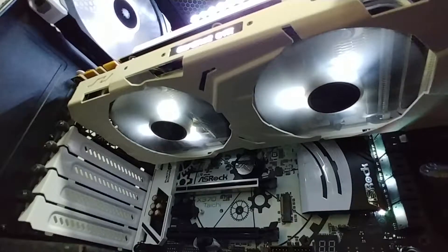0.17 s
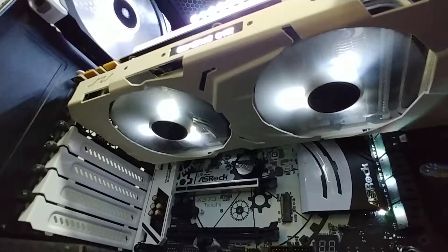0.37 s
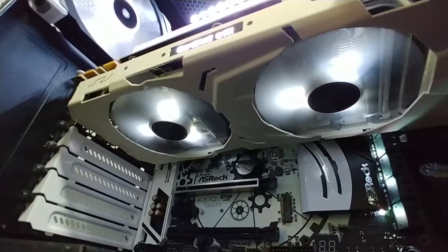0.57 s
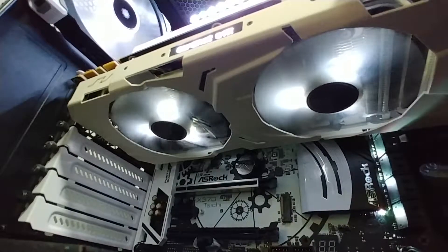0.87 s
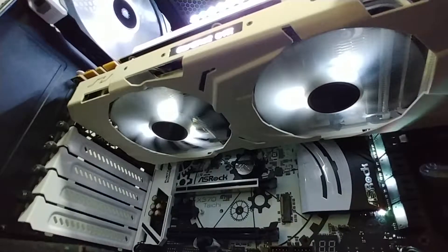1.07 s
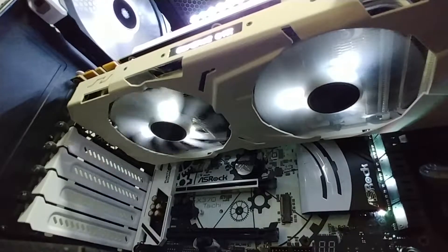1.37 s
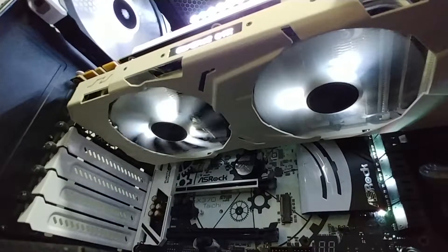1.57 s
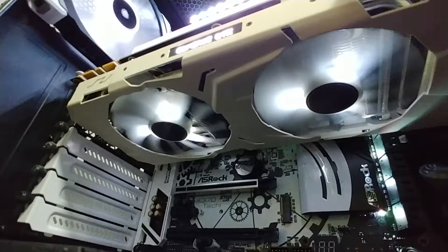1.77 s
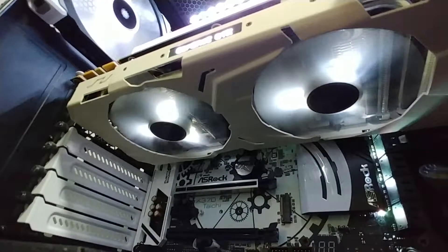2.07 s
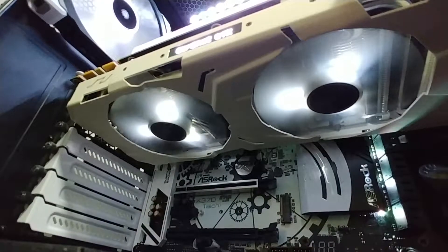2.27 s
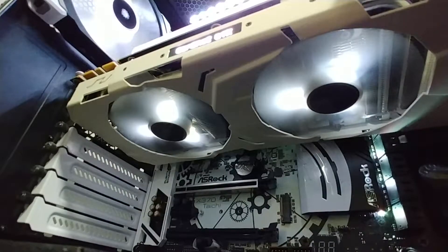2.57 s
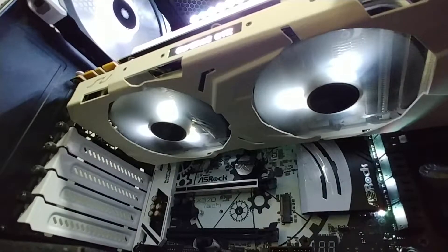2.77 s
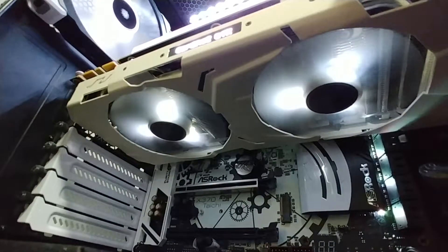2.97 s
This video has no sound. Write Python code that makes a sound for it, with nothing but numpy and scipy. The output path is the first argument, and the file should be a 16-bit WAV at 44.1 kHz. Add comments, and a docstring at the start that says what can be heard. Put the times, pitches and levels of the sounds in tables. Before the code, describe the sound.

Steady low fan whir and hum, faint once-a-second ticks, and two short plastic rattles late on.

```python
"""Rubbing fan in an open computer case

Fans whir as filtered noise and hum as wavering sines; their draught puffs at the right microphone.
A fast fan rubs in two short bursts: one click per turn rings plastic modes and echoes in the case,
over a low growl of noise, with a brief hiss and a last light scrape.
A faint buzz pulses evenly, and a tick like a clock's comes once a second through the room."""
import sys
import numpy as np
from scipy import signal
from scipy.fft import rfft, irfft
from scipy.io import wavfile
from scipy.ndimage import uniform_filter1d

SR = 44100
rng = np.random.default_rng(int(sys.argv[2]) if len(sys.argv) > 2 else 0)


def wrap_up_sound(samples):
    """Save the sound to the file named by the first command line argument, as 16-bit audio."""
    columns = np.atleast_2d(samples).T
    # keep every value between -1 and 1, then stretch to whole-number steps
    tamed = np.clip(columns, -1, 1)
    steps = np.round(tamed * 32767).astype(np.int16)
    wavfile.write(sys.argv[1], SR, steps)


N = 138033
TIME = np.arange(N) / SR  # s
FREQS = np.maximum(np.arange(N // 2 + 1) * SR / N, 1)  # Hz

# Every pan_db and balance_db is left minus right; every colour is a relative noise spectrum.
# Rush of air through fans and case: frequency_hz [Hz], density_db [dB per Hz]
AIR_COLOUR = [(25, 0.5), (50, 5.5), (85, 5.5), (115, 6.5), (150, -0.1), (185, 2), (220, -3.5), (265, -0.75),
              (305, -5), (350, -2.5), (395, -7.5), (430, -3), (490, -2.5), (540, -9), (600, -7.5),
              (670, -14.5), (880, -13.5), (970, -11), (1030, -12), (1130, -8), (1290, -8), (1450, -16),
              (1950, -16), (2170, -13), (2330, -18.5), (2450, -15.5), (2650, -20.5), (3100, -20),
              (3480, -17), (3800, -22), (4550, -23.5), (5300, -24.5), (5700, -29.5), (6300, -31.5),
              (7400, -37), (9000, -41.5), (12000, -51)]
# Stereo balance of the air: frequency_hz [Hz], balance_db [dB]
AIR_BALANCE = [(40, -9.5), (110, -3), (480, -3.5), (760, 3.5), (1100, -5), (1700, -1), (2200, -3),
               (3400, -8.5), (5000, -3), (5400, -6), (5900, -4), (6800, -1), (11000, -0.5)]
# Left-right likeness of the air: frequency_hz [Hz], correlation [-1 to 1]
AIR_CORRELATION = [(40, -0.41), (130, 0.54), (270, 0.79), (470, .8), (650, -0.41), (780, 0.47), (900, -0.8),
                   (1080, 0.32), (1170, -0.89), (1250, 0.18), (1420, -0.5), (1550, -0.15), (1850, -0.66),
                   (2050, -0.12), (2600, -0.33), (5000, 0.22), (11000, -0.024)]
# Motor and blade hums, bearing and coil whines: pitch_hz [Hz], level_db [dB before HUM_DB], pan_db [dB]
HUM_TONES = [(100.3, -45.3, -3), (120.1, -54, -1), (124.3, -55, -1), (239.9, -55.5, -5.5), (338, -64, -3.5),
             (360.5, -62.5, -3), (478.7, -62, -3), (719.5, -73, 1), (2400.3, -66, -10.5), (5761, -83, -10),
             (8641.5, -94, -2.5)]
# Narrow band of the electrical buzz: pitch_hz [Hz], level_db [dB], t60_s [s], pan_db [dB]
BUZZ_MODES = [(2660, -58, 0.047, -14), (2720, -60.5, 0.038, -1)]
# Puffs of draught on the microphone: centre_s [s], length_s [s], level_db [dB]
PUFFS = [(0.386, 0.05, -31.5), (0.789, 0.039, -32), (0.837, 0.091, -33.5), (1.25, 0.082, -40),
         (1.66, 0.15, -37), (2.007, 0.031, -29.5), (2.93, 0.032, -26.5), (3.007, 0.031, -26.5),
         (3.096, 0.051, -33)]
# Colour of the puffs: frequency_hz [Hz], density_db [dB per Hz]
PUFF_COLOUR = [(12, -12), (30, -6), (50, -1), (80, 2), (120, -10), (200, -28), (500, -68), (2000, -100)]
# Ticks in the room: start_s [s], level_db [dB before the direct and room gains]
TICKS = [(0.6001, -39), (1.598, -38.5), (2.5972, -39.5)]
# Ring of a tick: pitch_hz [Hz], level_db [dB against the tick], t60_s [s], pan_db [dB]
TICK_MODES = [(1435, 0, 0.018, -3), (2270, -11, 0.0077, 0), (3510, -2, 0.02, -2), (3840, -5.5, 0.018, -1),
              (4700, -13, 0.0095, -6), (5400, -0.5, 0.016, 9), (5580, -9, 0.015, 1), (7230, -10, 0.012, 10)]
# Colour of a tick's crack: frequency_hz [Hz], density_db [dB per Hz]
CRACK_COLOUR = [(600, -14), (1400, 2), (2700, 5), (3700, 0.5), (5600, -1.5), (6500, -19), (7600, -2.5),
                (9000, -35), (12000, -38)]
# Growl under both bursts, swelling with each: time_s [s], level_db [dB]
GROWL_LEVELS = [(2.09, -69), (2.14, -50), (2.19, -45), (2.25, -48), (2.33, -48.5), (2.4, -45.5),
                (2.46, -45.5), (2.52, -65)]
# Colour of the growl: frequency_hz [Hz], density_db [dB per Hz]
GROWL_COLOUR = [(150, -16.5), (270, -9), (360, -1), (490, 1.5), (600, -3.5), (660, -10), (800, -13),
                (1500, -25), (4000, -63)]
# Colour of the gritty hiss: frequency_hz [Hz], density_db [dB per Hz]
HISS_COLOUR = [(500, -20), (1600, 12), (4000, -8), (7000, -6), (10000, -10.5), (12000, -22)]
# Colour of the last light scrape: frequency_hz [Hz], density_db [dB per Hz]
SCRAPE_COLOUR = [(2500, -12), (4500, 6), (5250, 8), (6100, -11), (8000, -13), (12000, -38)]
# Blade touches, one a turn: start_s [s], level_db [dB before TOUCH_DB or SNAP_DB],
# tilt_db [dB per octave], rebound_db [dB added at each rebound]
TOUCHES = [(2.0398, -37.5, -10, -4), (2.073, -40, 0, -5), (2.111, -30, 0, -2), (2.1428, -26, 1, -2.5),
           (2.1727, -20.5, 7.5, -9), (2.2013, -24, 3, -4.5), (2.2307, -31, 4.7, -2),
           (2.3209, -31.5, -2.5, -17), (2.3530, -30, -2, -13), (2.3837, -24.5, 1, -19),
           (2.4111, -25, -5, -24), (2.4385, -23.5, 3, -11)]
# Plastic blade and shroud: pitch_hz [Hz, mean over touches], level_db [dB], t60_s [s], pan_db [dB]
BLADE_MODES = [(2920, -12, .0106, 1.5), (3060, -4, 0.0046, -9), (3860, -4, 0.0062, -6.5),
               (4310, -12.5, 0.0096, -16), (5100, -13.5, 0.002, -9), (5660, -21, 0.0027, -7)]
# Rough snap of each contact: frequency_hz [Hz], density_db [dB per Hz]
SNAP_COLOUR = [(800, -15), (2000, -7.5), (3500, 5.5), (4600, -2.5), (5400, -9.5), (7000, -22)]
# Delayed repeats of each knock: delay_s [s], left_db [dB], right_db [dB]; the first comes two rebound gaps
# later, like a further contact, the others are reflections inside the case
CASE_ECHOES = [(.00239, -9, -7), (.00346, -14, -10), (.0058, -13, -13.5)]

WHIR_DB, WHIR_FLICKER_DB = -42, 0.6
CHOP_HZ, CHOP_DEPTH, CHOP_ABOVE_HZ = 36.9, 0.049, 570
HUM_DB, HUM_WAVER_DB, HUM_WANDER_RAD = -0.5, 1.44, 0.3
BUZZ_PER_S = 29.97
PUFF_LEFT_DB = -16  # against the right channel
TICK_DIRECT_DB, TICK_ROOM_DB, TICK_ROOM_T60_S = -5.5, -5, 0.16
CRACK_DB, CRACK_ATTACK_S, CRACK_DECAY_S = -1.5, 0.00098, 0.0034
HISS_START_S, HISS_END_S, HISS_DB = 2.176, 2.222, -49
HISS_FADE_S, HISS_DECAY_S, GRAIN_DB = 0.0055, 0.045, 4.5
SCRAPE_START_S, SCRAPE_END_S, SCRAPE_DB, SCRAPE_FADE_S = 2.529, 2.552, -54, 0.011
TOUCH_DB, TOUCH_PITCH_SPREAD, REBOUND_S = 1, 0.011, 0.00122  # the spread is a share of the pitch
SNAP_DB, SNAP_DECAY_S = -13, 0.0013
KNOCK_CUTOFF_HZ, LEFT_LAG_S = 5700, 0.00009
CASE_DB, CASE_T60_S = -5.5, 0.064
CUTOFF_HZ = 12200


def from_db(db):
    """Logarithmic level: 20 dB is a tenfold amplitude."""
    return 10 ** (np.asarray(db) / 20)


def rms_one(x):
    """Normalization: division by the root mean square gives unit power."""
    return x / np.sqrt(np.mean(x ** 2) + 1e-20)


def panned(pan_db):
    """Level panning: left and right gains differ by pan_db at unit mean power."""
    gains = from_db(np.array([[.5], [-.5]]) * pan_db)
    return gains / np.sqrt(np.mean(gains ** 2, axis=0))


def across_hz(points):
    """Spectral interpolation: values run straight along a logarithmic frequency axis."""
    hz, value = np.transpose(sorted(points))
    return np.interp(np.log(FREQS), np.log(hz), value)


def drift(rate_hz):
    """Low-pass random motion: noise above rate_hz is weakened, leaving a spread of 1."""
    spectrum = rfft(rng.standard_normal(N))
    return rms_one(irfft(spectrum / (1 + (FREQS / rate_hz) ** 2), N))


def noise(colour, likeness=0, pan_db=0):
    """Mid-side synthesis: shared and opposed noises set the correlation, a filter the spectrum."""
    mid, side = rfft(rng.standard_normal((2, N)))
    opposed = side * np.array([[1], [-1]])
    both = np.sqrt(1 + likeness) * mid + np.sqrt(1 - likeness) * opposed
    low_cut = FREQS ** 2 / (FREQS ** 2 + 15 ** 2)
    shape = from_db(across_hz(colour)) * panned(pan_db) * low_cut
    return rms_one(irfft(both * shape, N))


def swell(start_s, end_s, level_db, fade_s):
    """Linear envelope: amplitude rises and falls over fade_s, with any hold between."""
    nearest_edge = np.minimum(TIME - start_s, end_s - TIME)
    return from_db(level_db) * np.clip(nearest_edge / fade_s, 0, 1)


def fall(start_s, decay_s):
    """Exponential decay: a sudden start dies by a factor e in every decay_s."""
    return (TIME >= start_s) * np.exp(-np.abs(TIME - start_s) / decay_s)


def delayed(x, seconds):
    """Propagation delay: one channel is heard a little later."""
    return np.interp(TIME - seconds, TIME, x)


def strike(times, levels_db, modes, vary_db):
    """Modal resonance: impulses ring damped two-pole modes, with random strength at each strike."""
    out = np.zeros((2, N))
    samples = (times * SR).astype(int)
    for k, (pitch_hz, mode_db, t60_s, pan_db) in enumerate(modes):
        variation_db = vary_db * rng.standard_normal(len(times))
        clicks = np.zeros(N) + 1e-18
        clicks[samples] = from_db(levels_db[k] + mode_db + variation_db)
        radius = from_db(-60 / (t60_s * SR))
        angle = 2 * np.pi * pitch_hz / SR
        feedback = [1, -2 * radius * np.cos(angle), radius * radius]
        ring = signal.lfilter([0, np.sin(angle)], feedback, clicks)
        out += panned(pan_db) * ring * (-1) ** k  # neighbours in opposite phase
    return out


def tail(x, t60_s):
    """Diffuse reverberation: convolution with noise that decays by 60 dB in t60_s."""
    t = TIME[:SR // 3]
    response = rng.standard_normal((2, len(t))) * from_db(-60 * t / t60_s)
    response /= np.sqrt(np.sum(response ** 2, axis=1, keepdims=True))
    return signal.fftconvolve(x, response, axes=1)[:, :N]


def whir():
    """Amplitude modulation of flow noise: the blades chop the air, whose upper part also flickers."""
    correlation = np.clip(across_hz(AIR_CORRELATION), -.98, .98)
    air = noise(AIR_COLOUR, correlation, across_hz(AIR_BALANCE))
    high_pass = FREQS ** 2 / (FREQS ** 2 + CHOP_ABOVE_HZ ** 2)
    upper = irfft(rfft(air) * high_pass, N)
    chop = 1 + CHOP_DEPTH * np.sin(2 * np.pi * CHOP_HZ * TIME + drift(2.9))
    flicker = from_db(WHIR_FLICKER_DB * drift(17))
    return from_db(WHIR_DB) * (air + upper * (chop * flicker - 1))


def hum():
    """Additive synthesis: sines of motors and electronics waver slightly in level and phase."""
    out = np.zeros((2, N))
    for pitch_hz, level_db, pan_db in HUM_TONES:
        gain = from_db(HUM_DB + level_db + HUM_WAVER_DB * drift(9.9))
        phase = 2 * np.pi * (pitch_hz * TIME + rng.random()) + HUM_WANDER_RAD * drift(15)
        out += panned(pan_db) * gain * np.sqrt(2) * np.sin(phase)
    return out


def buzz():
    """Periodic excitation: even pulses of the electronics ring one narrow band."""
    times = np.arange(0, TIME[-1], 1 / BUZZ_PER_S)
    return strike(times, np.zeros(len(BUZZ_MODES)), BUZZ_MODES, vary_db=3.5)


def draught():
    """Turbulent pressure: low noise of evened strength swells in puffs, nearly all at the right."""
    force = sum(from_db(level_db) * np.exp(-2 * ((TIME - centre_s) / length_s) ** 2)
                for centre_s, length_s, level_db in PUFFS)
    eddies = noise(PUFF_COLOUR)
    local_power = uniform_filter1d(eddies ** 2, size=2200, axis=1)  # over about 50 ms
    eddies = eddies / np.sqrt(local_power + 1e-9)
    return force * eddies * from_db([[PUFF_LEFT_DB], [0]])


def ticking():
    """Impact and reverberation: each tick's noisy crack and modal ring also excite the room."""
    start_s, level_db = np.transpose(TICKS)
    envelope = sum(from_db(level + CRACK_DB) * np.clip((TIME - start) / CRACK_ATTACK_S, 0, 1)
                   * fall(start, CRACK_DECAY_S) for start, level in TICKS)
    ring = strike(start_s, [level_db] * len(TICK_MODES), TICK_MODES, vary_db=1.5)
    ticks = envelope * noise(CRACK_COLOUR) + ring
    room = tail(ticks, TICK_ROOM_T60_S)
    return from_db(TICK_DIRECT_DB) * ticks + from_db(TICK_ROOM_DB) * room


def rubbing():
    """Friction noise: a growl under the rattle, a hiss after the hardest touch, a last light scrape."""
    growl_db = np.interp(TIME, *np.transpose(GROWL_LEVELS), left=-np.inf, right=-np.inf)
    growl = from_db(growl_db) * noise(GROWL_COLOUR, likeness=0.83, pan_db=-2.5)
    grit = rms_one(from_db(GRAIN_DB * drift(400)))  # rough, rapid changes of level
    hiss_level = swell(HISS_START_S, HISS_END_S, HISS_DB, HISS_FADE_S) * fall(HISS_START_S, HISS_DECAY_S)
    hiss = hiss_level * grit * noise(HISS_COLOUR, pan_db=5)
    scrape_level = swell(SCRAPE_START_S, SCRAPE_END_S, SCRAPE_DB, SCRAPE_FADE_S)
    scrape = scrape_level * grit * noise(SCRAPE_COLOUR, pan_db=-5)
    return growl + hiss + scrape


def touch(start_s, level_db, tilt_db, rebound_db):
    """Repeated impact: the blade strikes and rebounds twice, each turn at a slightly new pitch."""
    contact = np.arange(3)
    modes = np.array(BLADE_MODES)
    modes[:, 0] *= 1 + TOUCH_PITCH_SPREAD * rng.standard_normal()
    octaves = np.log2(modes[:, :1] / modes[:, 0].mean())
    levels_db = TOUCH_DB + level_db + octaves * tilt_db + contact * rebound_db
    return strike(start_s + contact * REBOUND_S, levels_db, modes, vary_db=1.0)


def rattle():
    """Impact in an enclosure: snaps and rings of the touches reach the ear directly and by reflection."""
    snap_level = sum(from_db(level_db + SNAP_DB) * fall(start_s, SNAP_DECAY_S)
                     for start_s, level_db, *_ in TOUCHES)
    snaps = snap_level * noise(SNAP_COLOUR, pan_db=-6)
    left, right = snaps + sum(touch(*row) for row in TOUCHES)
    # the knocks lose their highest treble; they reach the left microphone a little later
    knock_low_pass = signal.butter(4, KNOCK_CUTOFF_HZ, fs=SR, output="sos")
    direct = signal.sosfilt(knock_low_pass, [delayed(left, LEFT_LAG_S), right])
    echoes = sum(from_db([[left_db], [right_db]])
                 * np.array([delayed(channel, delay_s) for channel in direct])
                 for delay_s, left_db, right_db in CASE_ECHOES)
    return direct + echoes + from_db(CASE_DB) * tail(direct, CASE_T60_S)


def scene():
    """Superposition: all sources add at the open side of the case."""
    return whir() + hum() + buzz() + draught() + ticking() + rubbing() + rattle()


def record(dry):
    """Band limitation: a steep elliptic low-pass removes the top."""
    low_pass = signal.ellip(10, .1, 70, CUTOFF_HZ, fs=SR, output="sos")
    return signal.sosfilt(low_pass, dry)


dry = scene()
out = record(dry)
wrap_up_sound(out)
```